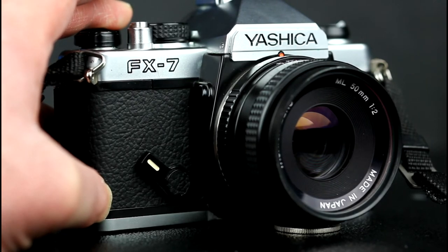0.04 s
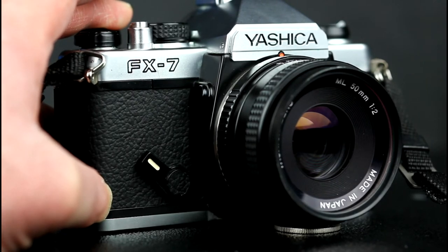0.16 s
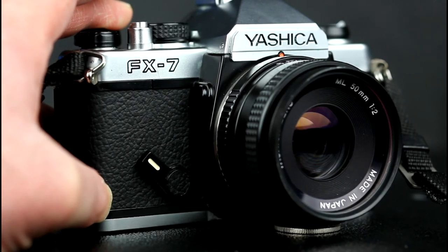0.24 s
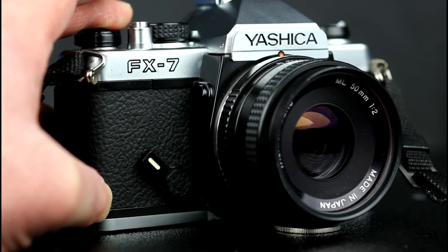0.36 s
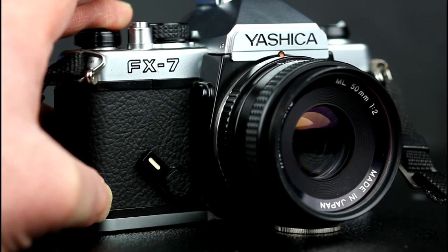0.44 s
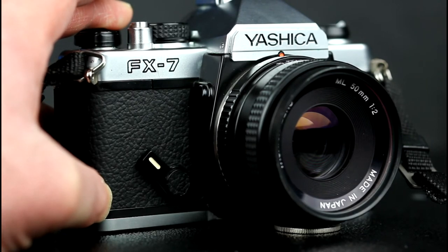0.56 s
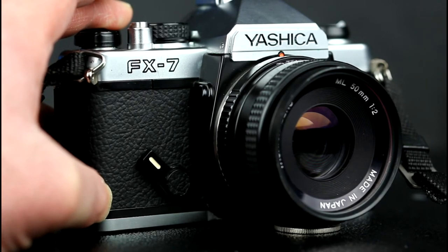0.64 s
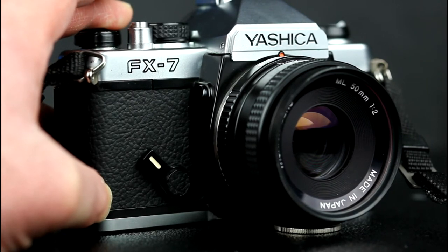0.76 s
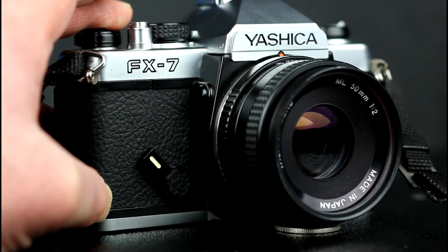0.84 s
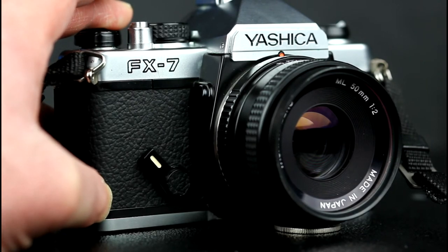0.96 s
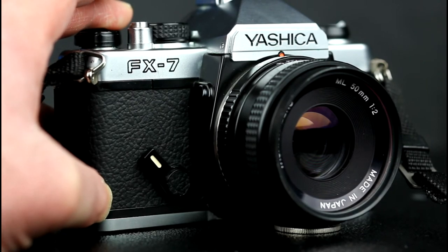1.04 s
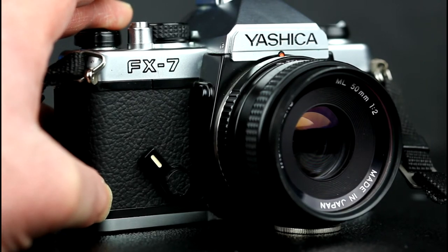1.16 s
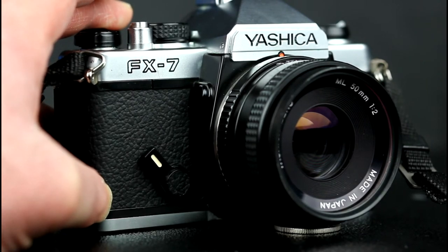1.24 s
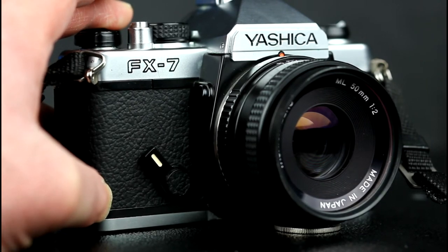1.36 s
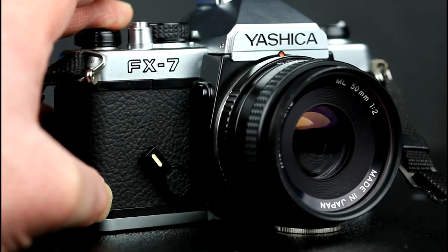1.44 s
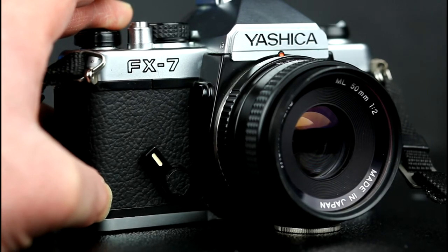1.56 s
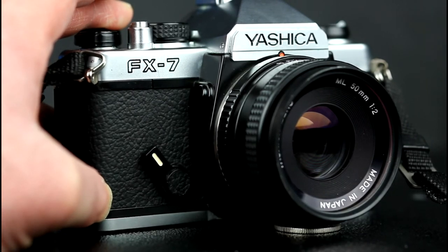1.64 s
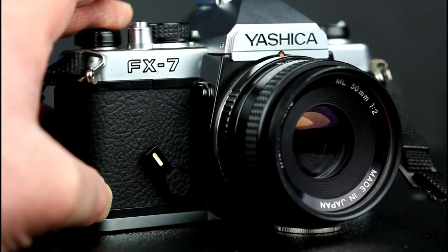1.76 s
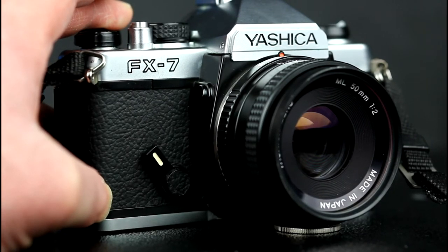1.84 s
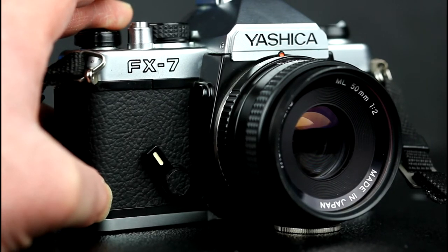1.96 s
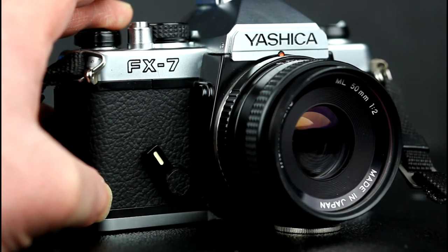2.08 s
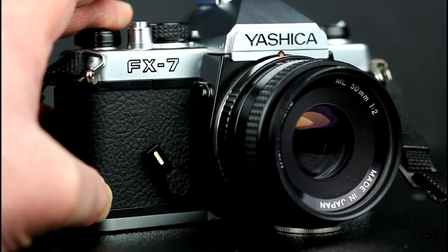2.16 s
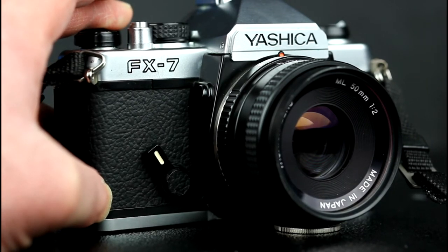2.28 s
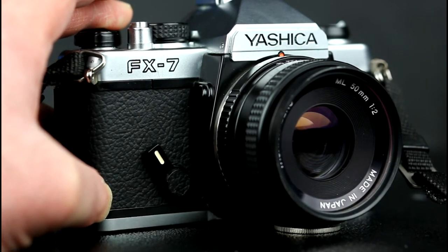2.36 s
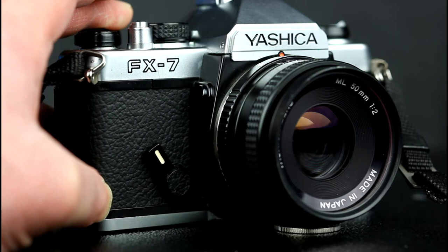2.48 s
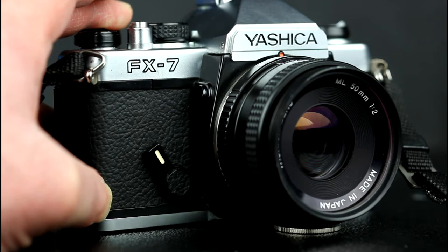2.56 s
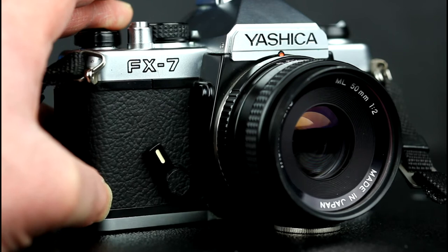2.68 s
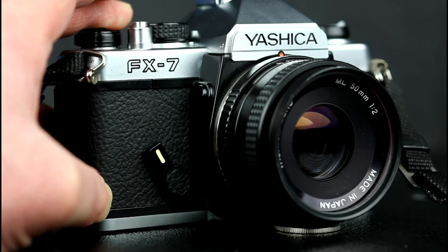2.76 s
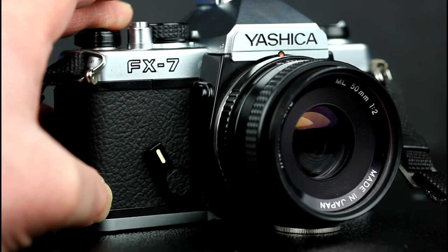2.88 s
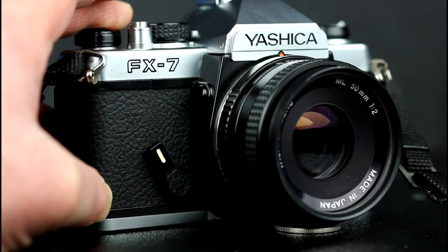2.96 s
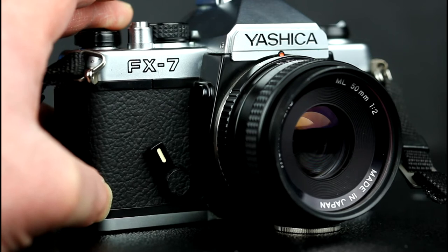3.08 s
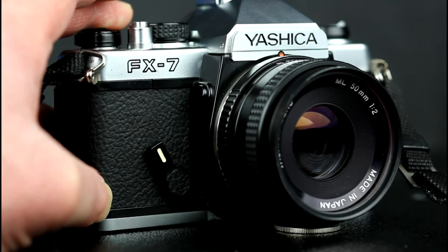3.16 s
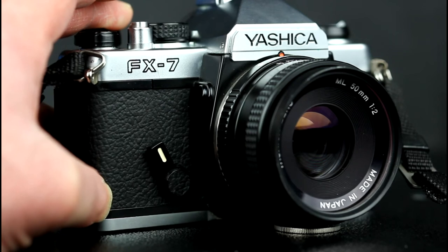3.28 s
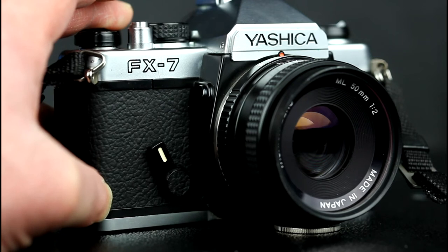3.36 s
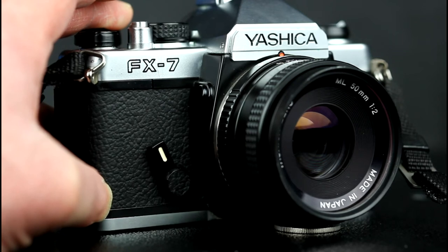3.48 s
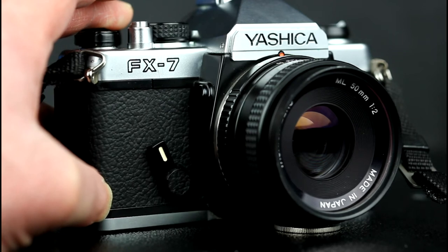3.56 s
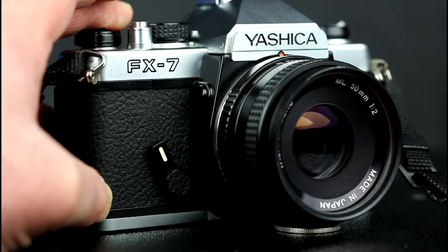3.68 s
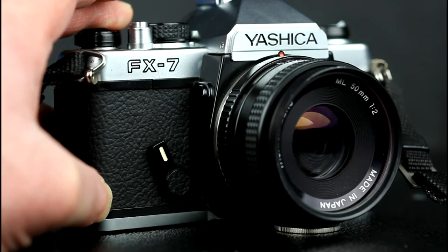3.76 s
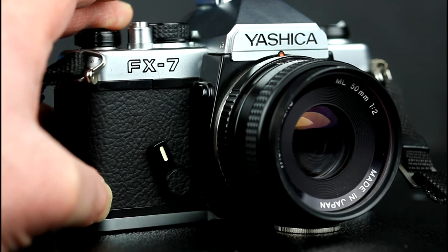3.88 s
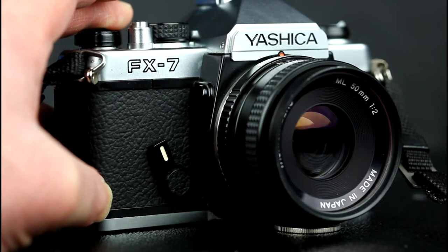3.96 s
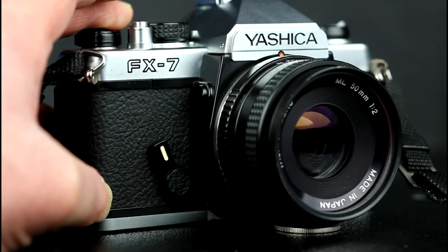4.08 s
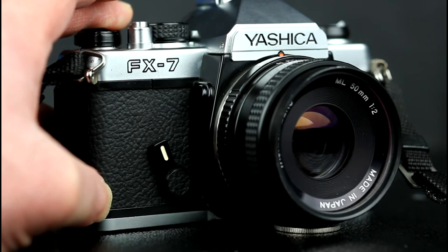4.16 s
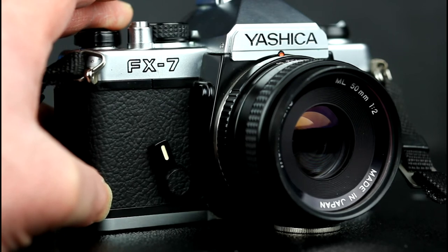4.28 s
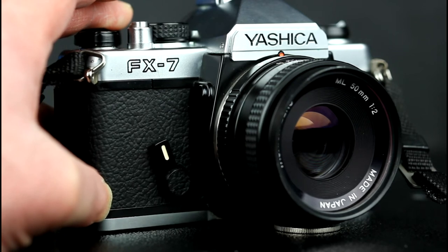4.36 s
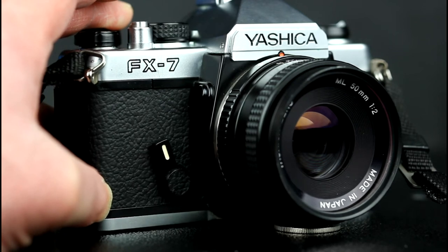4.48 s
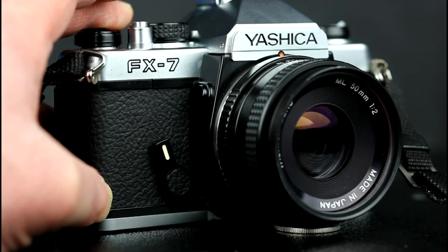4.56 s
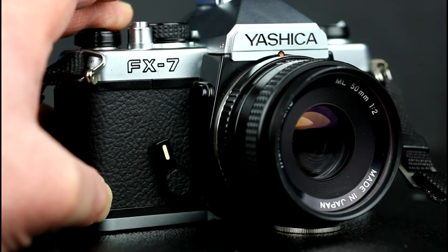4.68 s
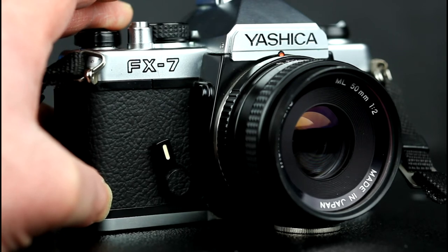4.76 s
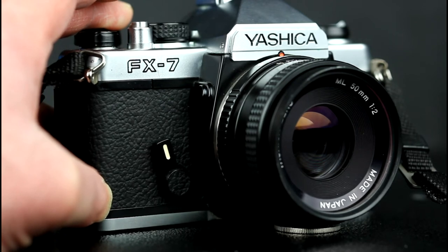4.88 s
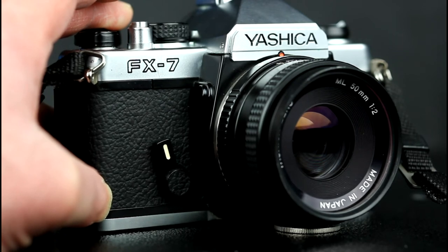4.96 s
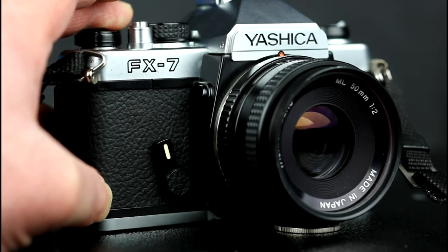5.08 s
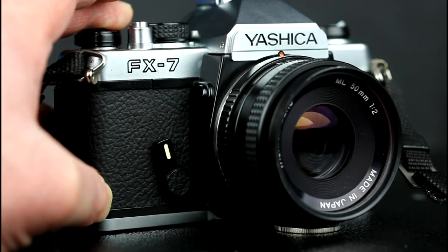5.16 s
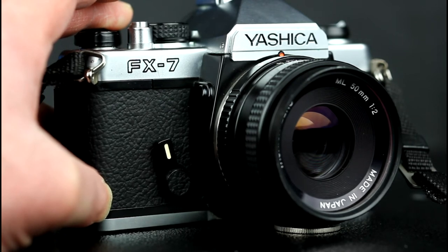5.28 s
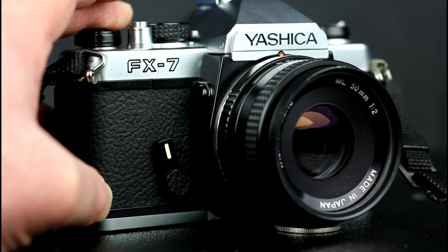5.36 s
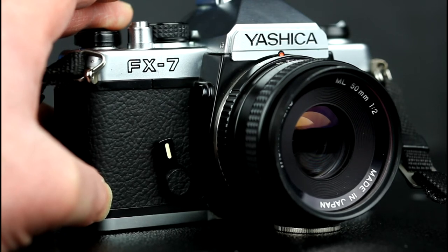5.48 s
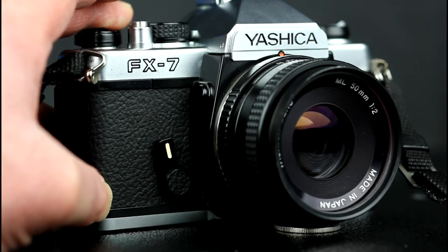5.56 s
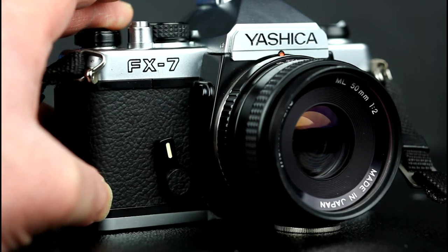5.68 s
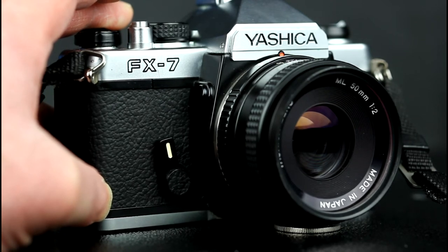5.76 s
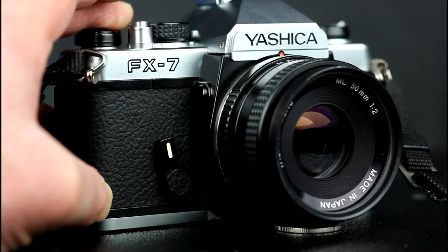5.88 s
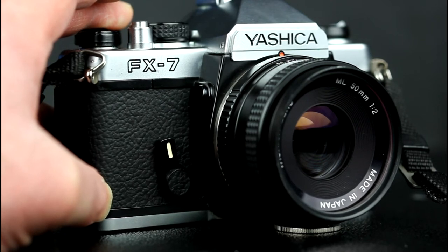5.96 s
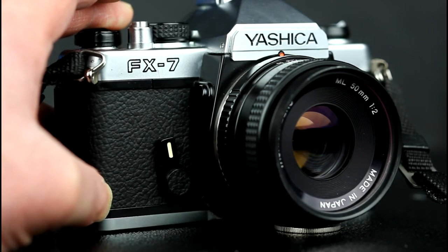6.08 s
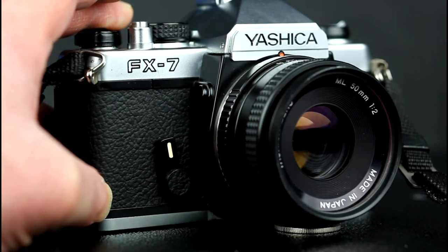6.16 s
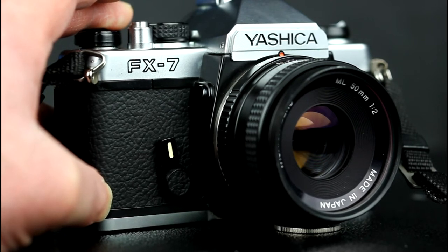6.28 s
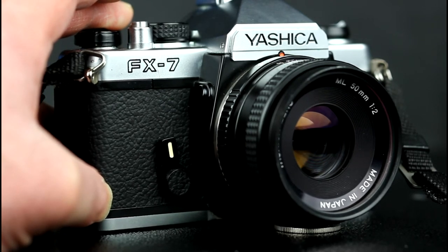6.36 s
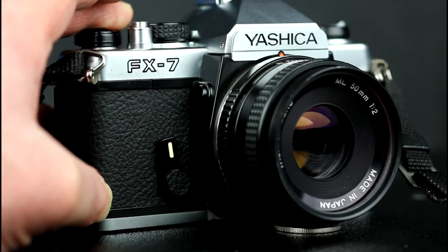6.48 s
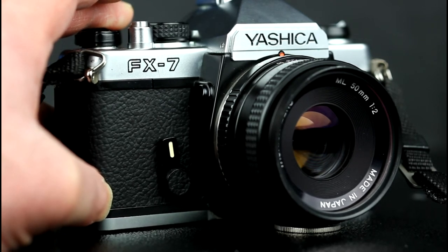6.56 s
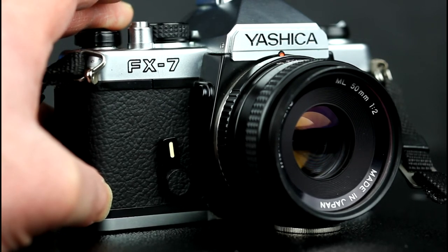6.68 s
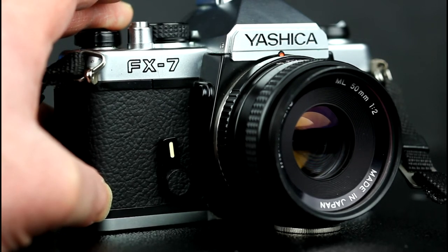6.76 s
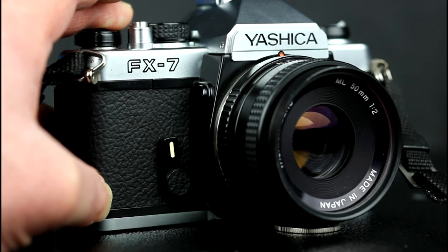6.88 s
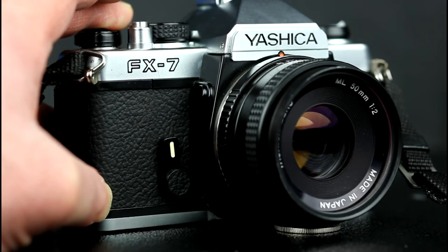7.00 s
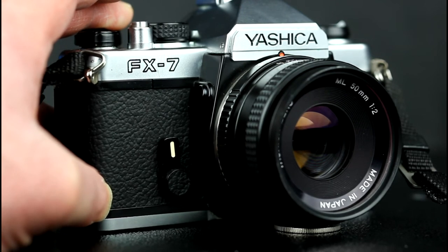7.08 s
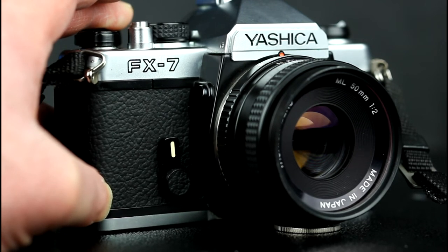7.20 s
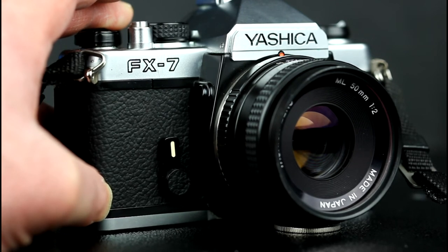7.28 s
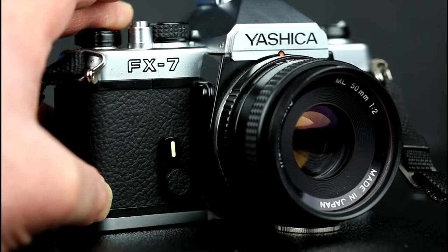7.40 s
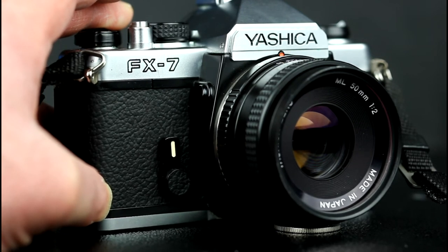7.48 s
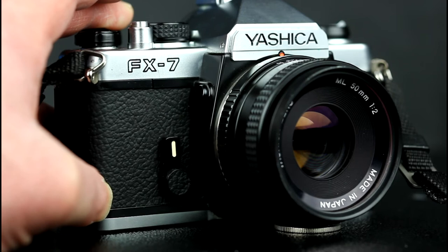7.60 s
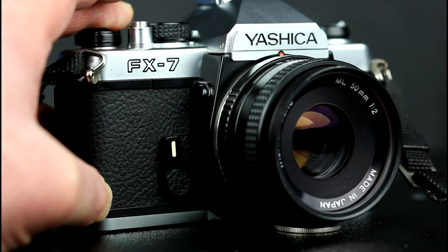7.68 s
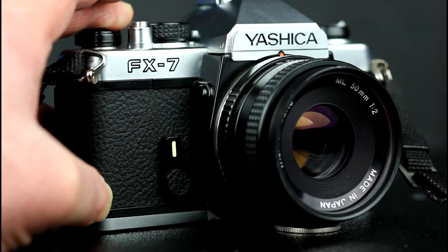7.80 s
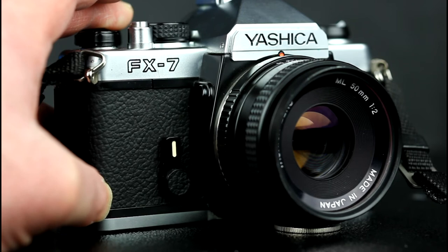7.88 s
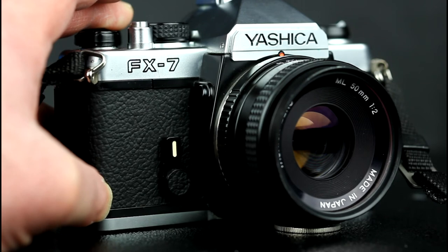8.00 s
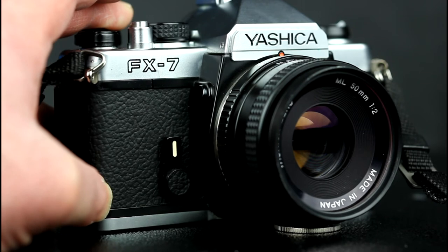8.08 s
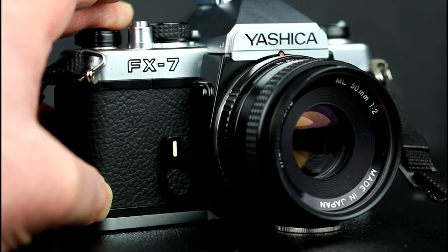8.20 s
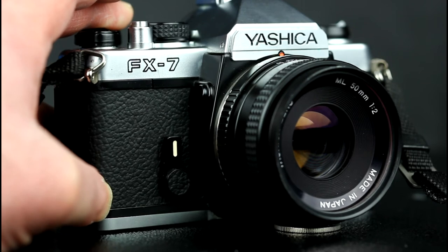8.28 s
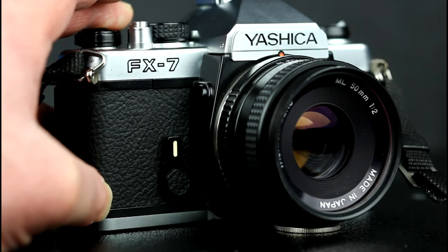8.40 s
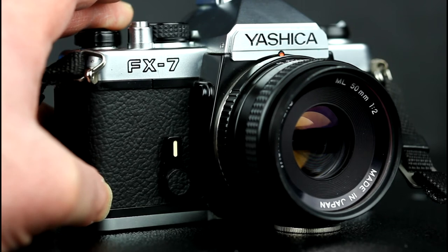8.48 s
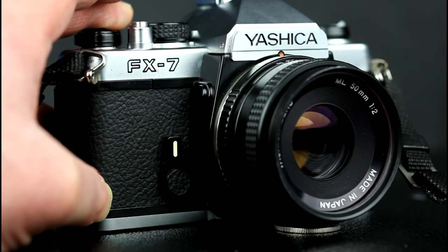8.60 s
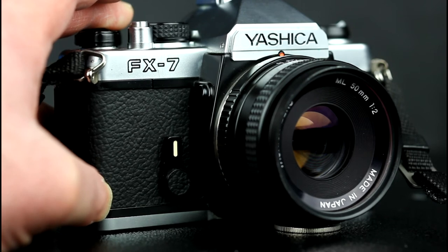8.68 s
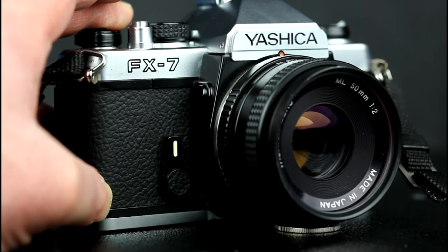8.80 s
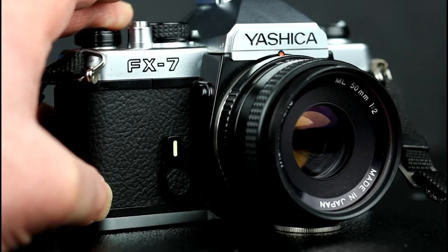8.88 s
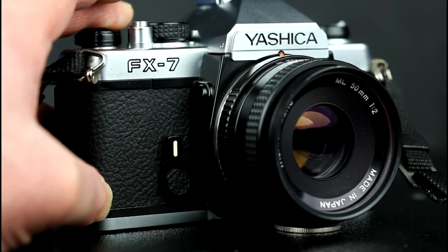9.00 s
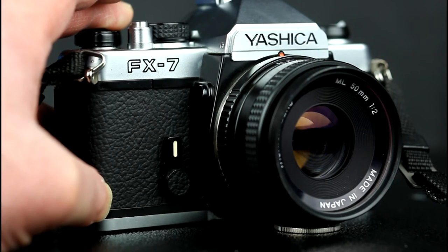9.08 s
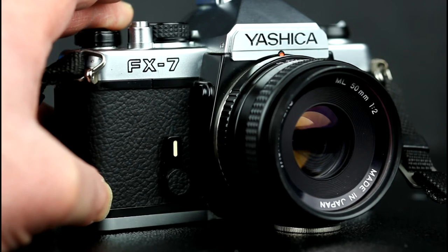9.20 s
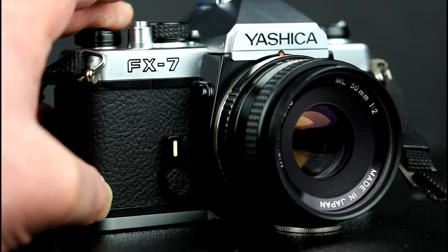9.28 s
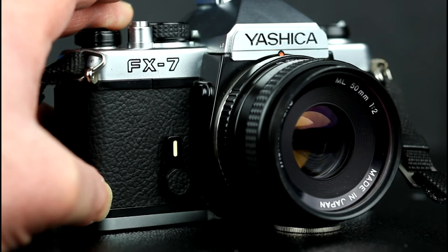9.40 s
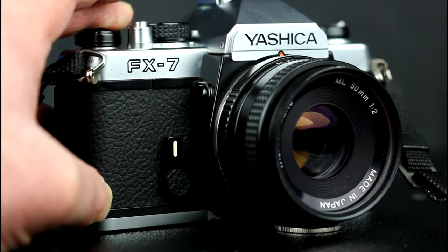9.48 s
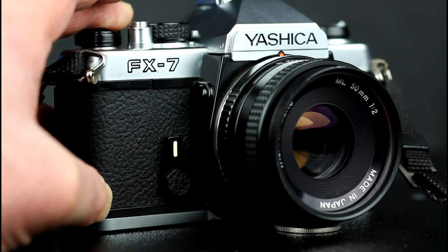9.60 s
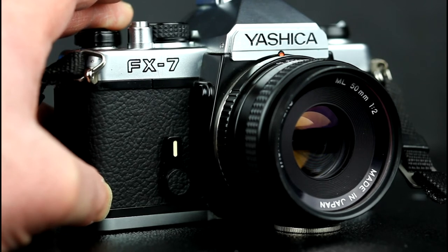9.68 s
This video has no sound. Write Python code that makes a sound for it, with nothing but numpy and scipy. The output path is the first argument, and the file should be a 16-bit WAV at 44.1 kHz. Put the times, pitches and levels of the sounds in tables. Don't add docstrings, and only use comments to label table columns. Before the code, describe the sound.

From 0 s a small camera's clockwork self-timer is already running, very close to the microphone: a steady, bright metallic whirr made of about 150 tiny tooth contacts per second, with a ringing, grainy rattle and slight rhythmic flutter. It slows gradually, growing a little stronger and coarser from about 3 to 6 s. At 5.98 s the shutter fires: a dense cluster of hard, sharp cracks, heard as one loud clack, with a dull mirror shudder, tiny bounces and a short spring hum. The recording level drops sharply, holds briefly and recovers by about 6.4 s. The whirr continues, slower, around 100 contacts per second, weakening until it halts at 8.44 s with a faint tick. Quiet low room rumble, soft hiss and a thin, extremely high electronic whine lie beneath throughout, exposed for a fifth of a second, then cut abruptly at 8.64 s to near silence.

```python
import sys
import numpy as np
from scipy import signal
from scipy.fft import rfft, irfft, next_fast_len
from scipy.io import wavfile
from scipy.ndimage import uniform_filter1d

SR = 44100
rng = np.random.default_rng(int(sys.argv[2]) if len(sys.argv) > 2 else 0)


def boost_factor(decibels):
    exponent = np.asarray(decibels, float) / 20
    return 10 ** exponent


def generate_wav(signal):
    frames = np.transpose(np.atleast_2d(signal))
    scaled = np.clip(frames, -1, 1) * 32767
    pcm = np.round(scaled).astype(np.int16)
    wavfile.write(sys.argv[1], SR, pcm)


N = 429534
STOP_S = 8.437


def rms_one(x):
    return x / np.sqrt(np.mean(x ** 2) + 1e-20)


def in_time(rows):
    s, *columns = np.transpose(rows)
    return [np.interp(np.arange(N) / SR, s, column) for column in columns]


def coloured(x, spectrum):
    size = next_fast_len(x.shape[-1])
    hz = np.maximum(np.fft.rfftfreq(size, 1 / SR), 1)
    curve_hz, curve_db = np.transpose(spectrum)
    gain = boost_factor(np.interp(np.log(hz), np.log(curve_hz), curve_db))
    return irfft(rfft(x, size) * gain, size)[..., :x.shape[-1]]


def resonance(x, hz, width_hz):
    r = np.exp(-np.pi * width_hz / SR)
    top = [(1 - r * r) / 2, 0, (r * r - 1) / 2]
    bottom = [1, -2 * r * np.cos(2 * np.pi * hz / SR), r * r]
    return signal.lfilter(top, bottom, x + 1e-18)


def drift(rate_per_s):
    r = np.exp(-2 * np.pi * rate_per_s / SR)
    noise = rng.standard_normal(N + SR)
    return rms_one(signal.lfilter([1], [1, -2 * r, r * r], noise)[SR:])


# pitch_hz, level_db (per Hz)
RUMBLE_COLOUR = [(8.8, -30), (15, 0), (83, -5), (108, -13), (194, -15), (237, -21), (413, -20), (450, -19),
                 (580, -49), (990, -120)]


def rumble():
    return boost_factor(-47) * rms_one(coloured(rng.standard_normal(N), RUMBLE_COLOUR))


# pitch_hz, level_db (per Hz)
HISS_COLOUR = [(30, -1.5), (300, 4), (1000, -2), (4000, -20), (9000, -16), (15700, -6.5)]
# pitch_hz, level_db (per Hz)
AMPLIFIER_COLOUR = [(710, -31.5), (1200, -9), (4180, -3), (5670, -5.5), (15000, -14)]


def hiss():
    mid, side = rms_one(coloured(rng.standard_normal((2, N)), HISS_COLOUR))
    wide = boost_factor(-48) * (mid + boost_factor(-13) * side * [[1], [-1]])
    common = boost_factor(-53) * rms_one(coloured(rng.standard_normal(N), AMPLIFIER_COLOUR))
    return wide + common


# pitch_hz, level_db
WHINES = [(15734.25, -53), (15747.2, -58)]


def whine():
    t = np.arange(N) / SR
    return sum(boost_factor(db) * np.sqrt(2) * np.sin(2 * np.pi * hz * t) for hz, db in WHINES)


def room(x):
    t60_s = .13
    t = np.arange(round(.4 * SR)) / SR
    tail = rng.standard_normal(len(t)) * boost_factor(-60 * t / t60_s) * (t > .002)
    return signal.fftconvolve(x, tail / np.sqrt(np.sum(tail ** 2)))[:N]


def mirror():
    level_db, t60_s, low_hz, high_hz = -18, .4, 600, 5000
    after = np.arange(N) / SR - SHUTTER[3][0]
    band = signal.butter(2, [low_hz, high_hz], "band", fs=SR, output="sos")
    shudder = rms_one(signal.sosfilt(band, rng.standard_normal(N)))
    return boost_factor(level_db - 60 * np.maximum(after, 0) / t60_s) * (after > 0) * shudder


# pitch_hz, level_db, t60_s (time to fall 60 dB)
SPRINGS = [(370, -22, .25), (486, -34, 1.1), (900, -34, .06)]


def springs():
    rise_s = .012
    after = np.maximum(np.arange(N) / SR - SHUTTER[1][0], 0)
    out = np.zeros(N)
    for hz, db, t60_s in SPRINGS:
        fade = boost_factor(db - 60 * after / t60_s) * (1 - np.exp(-after / rise_s))
        out += fade * np.sin(2 * np.pi * hz * after)
    return out


# start_s, level_db (peak), pitch_hz (ringing part), ring_db
SHUTTER = [(5.9809, -13.5, 6840, -3), (5.9827, 0, 6900, 3), (5.9867, -7.5, 7260, 1),
           (5.9911, 4.5, 11800, -2.5), (5.9952, 9, 5280, -4.5), (6.001, 4.5, 12400, -4),
           (6.0047, -8, 6280, 5), (6.0123, -8.5, 11500, -1), (6.023, -4.5, 11000, -3.5)]
# start_s, level_db (peak), pitch_hz (ringing part), ring_db
BOUNCES = [
    (6.0641, -11, 6200, -5),
    (6.0887, -14, 7300, -4),
    (8.4475, -31, 6500, -1),
]
# pitch_hz, level_db (per Hz)
CRACK_COLOUR = [(59, -63), (100, -27.5), (473, -6.5), (740, -36), (1210, -6.5), (1460, -13), (2440, -2),
                (4610, -12), (5240, -1.5), (5710, -7), (7690, -9), (12300, -4), (16200, -19.5)]


def shutter():
    rise_s, decay_s, slower_decay_s = 0.00028, 0.0019, 0.0023
    t = np.arange(round(.04 * SR)) / SR
    shape = np.exp(-t / decay_s) + 0.69 * np.exp(-t / slower_decay_s)
    shape = shape * np.minimum(t / rise_s, 1)
    out = np.zeros(N)
    for s, db, hz, ring_db in SHUTTER + BOUNCES:
        burst = rng.standard_normal(len(t))
        crack = rms_one(coloured(burst, CRACK_COLOUR))
        ring = boost_factor(ring_db - 1.5) * rms_one(resonance(burst, hz, 900))
        i = round(s * SR)
        out[i:i + len(t)] += boost_factor(db - 6.0) * (crack + ring) * shape
    return out


# time_s, teeth_passed
WHEEL = [(0.0, -0.06), (0.288, 45.5), (0.446, 68.09), (1.254, 190.26), (1.6, 236.53), (2.335, 346.43),
         (2.552, 375.81), (3.04, 444.93), (3.4, 497.7), (3.757, 543.41), (4.527, 648.37), (5.053, 711.88),
         (5.741, 798.33), (6.081, 835.84), (6.98, 936.91), (7.418, 977.7), (8.424, 1067.19),
         (8.47, 1070.11)]
# place (share of a tooth, negative is before the whole count), level_db,
# brightness_db
CONTACTS = [(-.24, -2, -5.5), (-.11, -3, -3.5), (.23, -4.5, 1.5), (.38, -6.5, -6)]


def escapement():
    jitter_s, rattle_per_s, rattle_db, settling_db_per_s = .00025, 1500, -21.5, .4
    teeth = in_time(WHEEL)[0] + .4 * drift(3)
    at, level_db, bright_db = [], [], []
    for place, db, bright in CONTACTS:
        hits = np.flatnonzero(np.diff(np.floor(teeth - place)) > 0)
        late = np.round(jitter_s * SR * rng.standard_normal(len(hits))).astype(int)
        at.append(hits + late)
        level_db.append(np.full(len(hits), float(db)))
        bright_db.append(np.full(len(hits), float(bright)))
    loose = np.flatnonzero(rng.random(N) < rattle_per_s / SR)
    surprise_db = 4.0 * np.minimum(rng.exponential(1, len(loose)), 3)
    at.append(loose)
    level_db.append(rattle_db - settling_db_per_s * loose / SR + surprise_db)
    bright_db.append(np.full(len(loose), -3.0))
    at = np.concatenate(at)
    running = (at > 0) & (at < STOP_S * SR)
    return at[running], np.concatenate(level_db)[running], np.concatenate(bright_db)[running]


# time_s, level_db
DRIVE = [(0, -31), (.4, -33.5), (.82, -31), (1.33, -34.5), (1.93, -29.5), (2.45, -31.5), (3.37, -28.5),
         (3.43, -32), (4.38, -28), (5.7, -27.5), (5.82, -31), (5.96, -29), (6.12, -26.5), (6.3, -31),
         (6.6, -28.5), (7.22, -32.5), (8.38, -33), (8.44, -31.5)]
# share_of_drive_swing, early_db, middle_db, late_db (against the mean drive)
GROUPS = [(.3, -11.5, -13.5, -12.5), (1.08, -0.5, -1.24, -0.7), (0.42, -11, -7.5, -11)]


def ringing_levels():
    mean_db, gear_teeth, gear_start_teeth = -31, 33.6, 17.5
    drive_db, = in_time(DRIVE)
    turn = 2 * np.pi * (in_time(WHEEL)[0] - gear_start_teeth) / gear_teeth
    swell_db = 0.7 * np.cos(turn) + 0.2 * np.cos(2 * turn)
    swing_db = drive_db - mean_db + swell_db
    lever, = in_time(LEVER)
    levels = []
    for share, *stage_db in GROUPS:
        loading_db = np.interp(lever, range(3), stage_db)
        levels.append(mean_db + share * swing_db + loading_db + 0.39 * drift(14.0))
    return levels


def scuff(clicks):
    r = np.exp(-1 / (.0003 * SR))
    burst = signal.lfilter([(1 - r) ** 1.5 * 2], [1, -2 * r, r * r], clicks + 1e-18)
    return burst * rng.standard_normal(N)


# time_s, position (0 early, 1 middle, 2 late)
LEVER = [(0, 0), (3.4, 0.2), (4.3, 1), (5.9, 1.3), (6.9, 1.8), (8.5, 2.1)]
# pitch_hz, width_hz, early_db,
# middle_db, late_db
RINGING_PARTS = [(951, 87, -12, -14.5, -6.5), (1220, 115, -8.5, -10, -6.5), (1412, 40, -8, -11, -10),
                 (1608, 160, -12.5, -18.5, -9), (1863, 90, -9.5, -17.5, -4), (2160, 310, -15, -15.5, -7),
                 (2420, 150, -6, -9, -4.5), (2772, 150, -3.5, -12, -7.5),
                 (3146, 167, -12, -14, -9.5), (3402, 90, -9.5, -7.5, -7.5), (3708, 120, -9.5, -4.5, 3.5),
          (3969, 226, -5.5, -4.5, -4), (4410, 110, -8, -8.5, -2), (4870, 120, -3.5, -8, -3),
          (5293, 130, 1, -5, -1), (5957, 76, -2, -5, -7.5), (6150, 85, -4, -6.5, -2.5),
          (6580, 240, -4, -2.5, 3.5), (6840, 30, 1, 0.5, -7.5), (7000, 120, -6, -6, -3),
          (7705, 270, 2.5, 0, 3.5), (7890, 420, -1, -3.5, 0.5),
                 (8570, 150, -14.5, -9.5, -10), (9215, 590, -16, -7.5, -7.5), (10670, 1400, -15.5, -13.5, -15),
        (11860, 510, -22, -12, -18.5), (11840, 310, -13.5, -17.5, -22), (13040, 400, -17, -12.5, -11.5),
        (13700, 890, -11.5, -14.5, -23.5), (15260, 620, -16, -14.5, -17.5)]


def whirr():
    at, level_db, bright_db = escapement()
    lever, = in_time(LEVER)
    groups = np.zeros((3, N))
    for k, (hz, width_hz, *stage_db) in enumerate(RINGING_PARTS):
        db = level_db + bright_db * np.log2(hz / 2500) / 2
        db = db + np.interp(lever[at], range(3), stage_db)
        strength = 0.78 + 0.42 * rng.standard_normal(len(at))
        clicks = np.zeros(N)
        np.add.at(clicks, at, boost_factor(db) * strength)
        if hz > 8300:
            width_hz = width_hz * 1.5
            clicks = resonance(scuff(clicks), hz, width_hz)
        groups[int(hz > 3000) + int(hz > 9000)] += resonance(clicks, hz, width_hz) * (-1) ** k
    out = 0
    for group, db in zip(groups, ringing_levels()):
        loudness = np.sqrt(uniform_filter1d(group[:round(STOP_S * SR)] ** 2, size=SR // 2))
        loudness = np.pad(loudness, (0, N - len(loudness)), "edge")
        out = out + group / loudness * boost_factor(db)
    return out


def scene():
    camera = whirr() + shutter() + springs()
    camera = camera + boost_factor(-10.0) * room(camera)
    return camera + mirror() + rumble() + hiss() + whine()


def gain_control_db():
    depth_db, start_s, attack_s, hold_s, release_s = -16, 5.982, 0.016, .15, 0.089
    after = np.arange(N) / SR - start_s
    held = np.maximum(after - attack_s - hold_s, 0)
    return depth_db * np.clip(after / attack_s, 0, 1) * np.exp(-held / release_s)


def top_cut(x):
    return signal.sosfilt(signal.butter(12, 16470, fs=SR, output="sos"), x)


def record(dry):
    top_hz, cut_s = 15790, 8.639
    x = coloured(dry * boost_factor(gain_control_db()), [(top_hz - 20, 0), (top_hz + 30, -45)])
    after = np.arange(N) / SR - cut_s
    x = np.clip(x, -1, 1) * np.clip(-after / 0.002, 0, 1)
    settling = (after > 0) * 0.002 * np.exp(-after / 0.25) * np.cos(6.3 * after)
    return top_cut(x + settling)


dry = scene()
out = record(dry)
generate_wav(out)
```